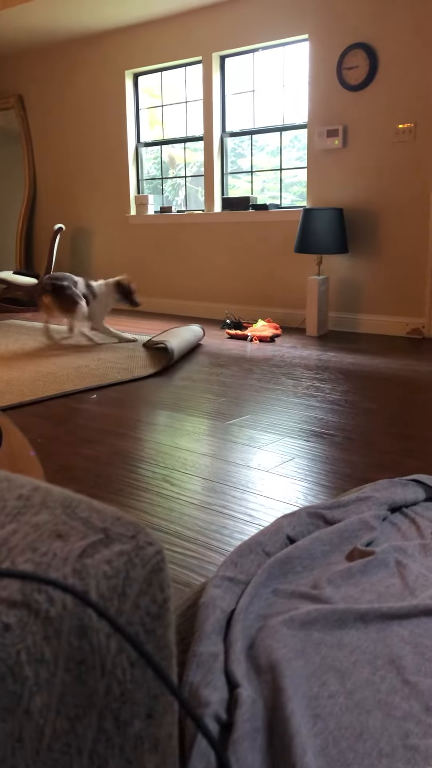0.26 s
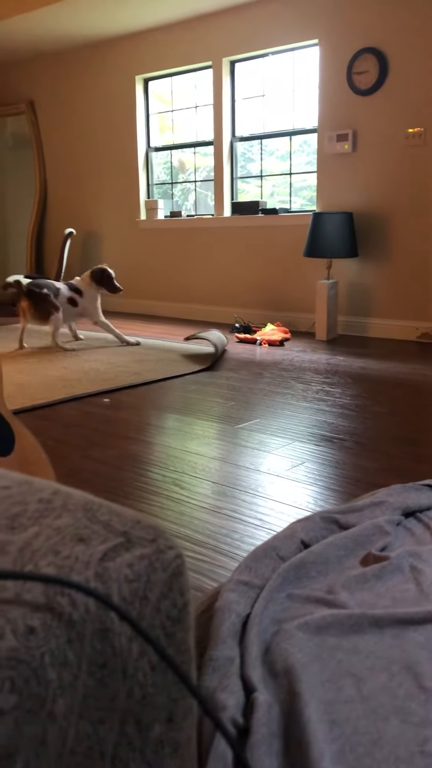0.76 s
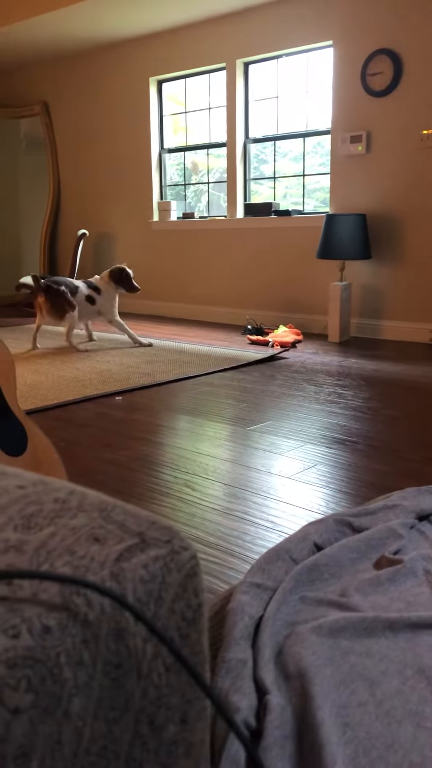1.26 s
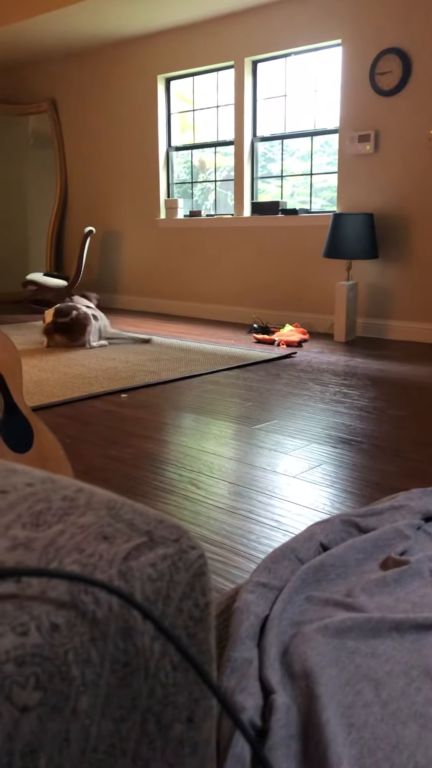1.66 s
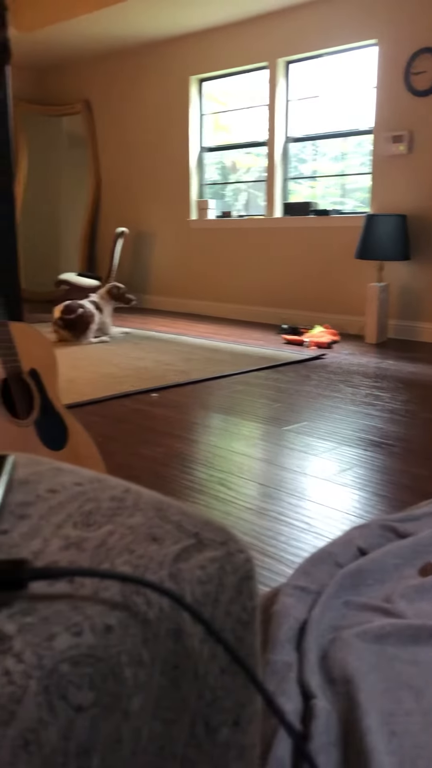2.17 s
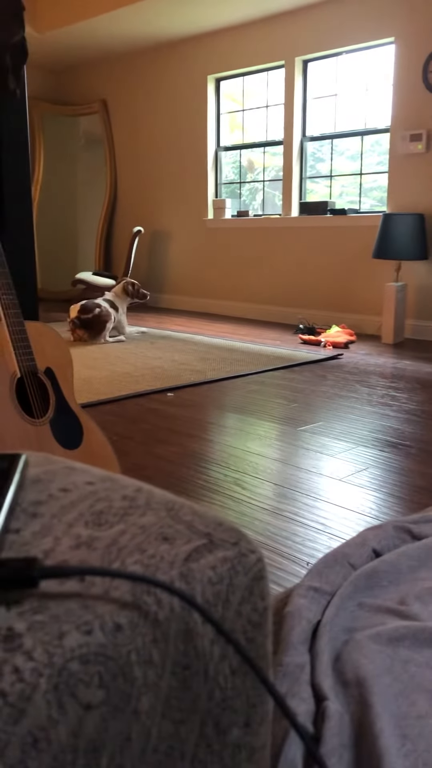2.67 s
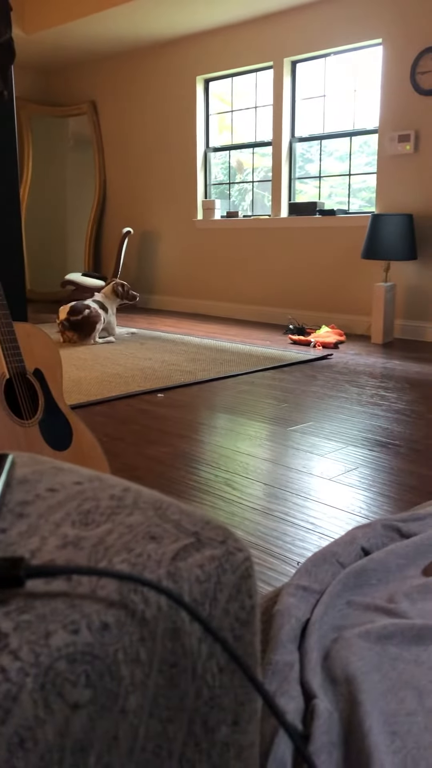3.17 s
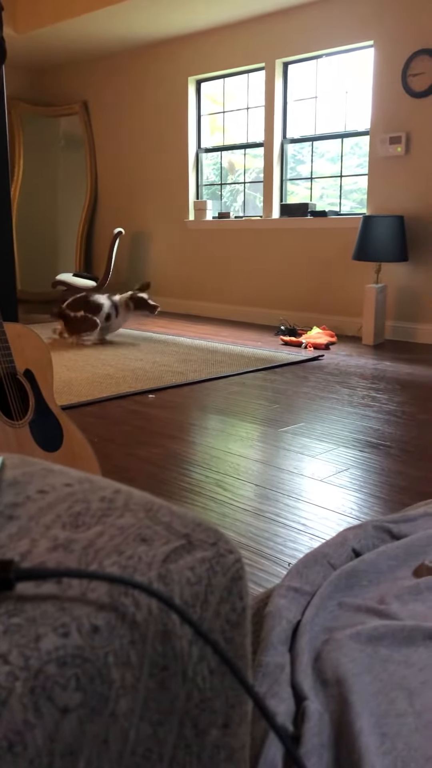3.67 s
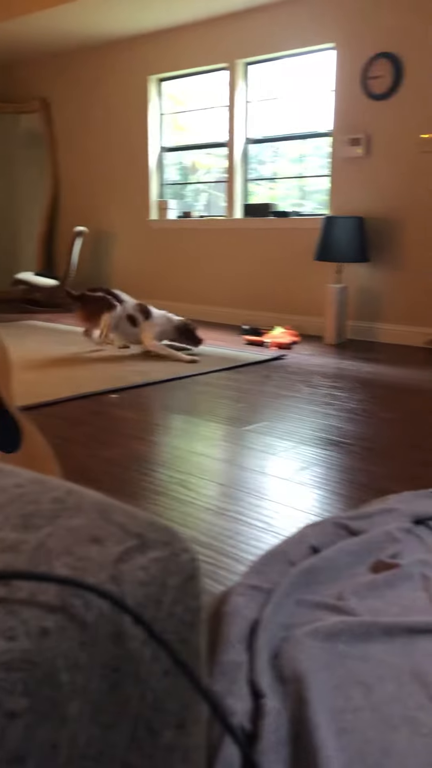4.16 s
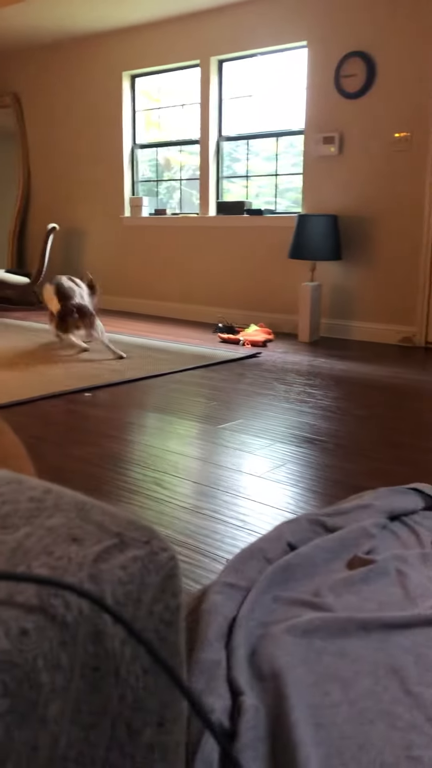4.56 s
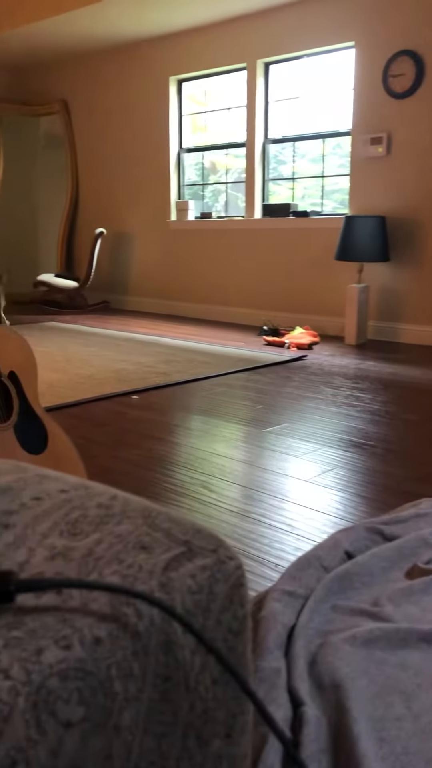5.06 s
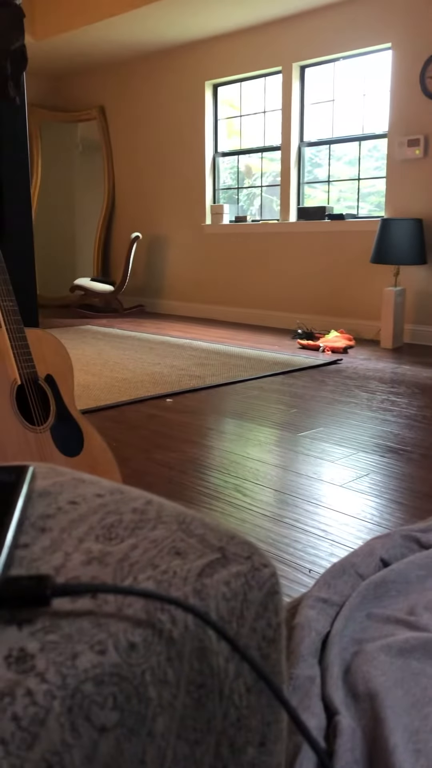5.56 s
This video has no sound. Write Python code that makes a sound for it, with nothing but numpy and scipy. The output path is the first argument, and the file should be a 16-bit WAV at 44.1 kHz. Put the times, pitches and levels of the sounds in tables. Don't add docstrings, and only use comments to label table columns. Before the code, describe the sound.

In an echoing living room, paws shuffle, a rug edge smacks the floor, and scrabbling claws end in hard rattling snaps.

```python
import sys
import numpy as np
from scipy import signal
from scipy.fft import rfft, irfft, next_fast_len
from scipy.io import wavfile

SR = 44100
rng = np.random.default_rng(int(sys.argv[2]) if len(sys.argv) > 2 else 0)


def ratio_of_db(decibels):
    return 10 ** (np.asarray(decibels, float) / 20)


def wav_record(signal):
    frames = np.transpose(np.atleast_2d(signal))
    bounded = np.clip(frames, -1, 1)
    quanta = np.round(bounded * 32767).astype(np.int16)
    wavfile.write(sys.argv[1], SR, quanta)


N = 257103

# frequency in Hz, density in dB per Hz.
AIR_SPECTRUM = [(15, -42), (25, -12), (97, -4), (166, -6.5), (190, -17.5), (700, -18), (1070, -25.5),
                (16000, -42)]
AIR_DB_RMS = -63.5
# frequency in Hz, level in dB rms.
WHINES = [(904.4, -76), (7197, -101), (8000, -93)]

# start in seconds, length in seconds, pad push in dB, claw drag in dB, pile brush in dB.
LEG_STROKES = [(-.03, .12, -42.5, -49, -56.5), (0.13, 0.057, -45.5, -53, -51.5),
               (0.186, 0.079, -44.5, -50.5, -56.5), (0.304, .035, -42, -48, -70),
               (0.358, 0.053, -46, -48.5, -65), (0.42, 0.044, -42.5, -48, -49), (.47, .13, -54, -54.5, -68),
               (1.403, 0.053, -46, -46.5, -65), (1.457, .055, -43, -56, -70), (1.515, .1, -42, -47.5, -51),
               (1.609, 0.091, -42, -47, -53), (1.721, 0.2, -43, -46.5, -54), (1.878, 0.16, -49.5, -54.5, -64),
               (2.054, .11, -48, -52.5, -59), (2.146, 0.085, -56.5, -53, -58.5),
               (3.288, .095, -52, -57.5, -59), (3.37, 0.09, -49.5, -47.5, -64), (3.462, .13, -39, -44.5, -53),
        (3.588, .16, -38, -41, -49.5), (3.75, .1, -41.5, -44.5, -67), (3.87, .1, -37, -44.5, -54),
        (3.958, 0.1, -45, -50.5, -56), (4.092, .13, -48, -53, -64), (4.248, 0.054, -48, -46, -58),
        (4.296, 0.073, -35.5, -42, -53), (4.361, 0.117, -32, -35.5, -53), (4.49, .13, -40.5, -42.5, -52.5),
        (4.658, 0.13, -34.5, -41, -47), (4.784, 0.11, -39, -46, -56), (4.854, 0.097, -36, -39.5, -57),
        (4.973, 0.15, -46.5, -48.5, -70), (5.164, .04, -38, -31, -65), (5.214, 0.13, -47, -39.5, -59),
        (5.263, 0.17, -43.5, -48.5, -42), (5.452, 0.12, -45.5, -57, -39.5), (5.56, .13, -49, -61, -50),
        (5.702, .09, -49, -60, -59), (5.78, .07, -55, -56, -53)]
GRIP_S, LET_GO_S, SAG_DB_PER_S = 0.0144, 0.018, 22
GRIP_SHARE = 0.22
JOISTS_UNDER_PUSH_DB = -21

# time in seconds, peak in dB, pitch in Hz.
BODY_DROPS = [(.005, -43, 128), (.165, -48, 126), (.47, -38, 119), (.472, -36, 271), (.92, -65, 110),
              (1.464, -26, 261), (1.476, -48, 95), (1.501, -32, 147), (1.505, -46, 206), (1.87, -44.5, 127),
              (2.061, -39, 248), (2.16, -55, 253), (3.22, -56.5, 112.7), (3.345, -36, 382),
              (3.40, -35.5, 199), (3.52, -51, 101), (3.901, -30, 144), (3.949, -40, 122), (3.962, -22, 294),
              (5.285, -30, 247), (5.30, -36.5, 159), (5.41, -26.5, 345), (5.433, -26, 246),
              (5.445, -47, 90), (5.56, -52, 100), (5.76, -46, 104), (5.717, -37, 241), (5.75, -36, 340),
              (5.783, -40, 286)]
# time in seconds, peak in dB, pitch in Hz, fibre brush in dB.
CLAW_TICKS = [(.1476, -33, 1790, -60), (.1752, -32, 2630, -84), (.188, -28, 1680, -65),
              (0.3129, -32, 1440, -71), (0.3708, -38, 1840, -48), (0.4371, -32, 1750, -54),
              (1.4622, -32, 1450, -65), (1.517, -27.5, 2560, -65), (1.5637, -30, 2400, -51),
              (3.306, -42, 1524, -54.5), (3.456, -34, 2300, -48), (3.5203, -29, 1450, -46),
              (3.7303, -24.5, 1550, -65), (3.9027, -34, 1900, -52), (4.2644, -24.5, 2560, -61),
              (4.2785, -26, 2660, -53), (4.2967, -18.5, 2090, -52), (4.3256, -25, 2200, -43),
              (4.3668, -12, 2740, -37.5), (4.3802, -37, 2260, -51), (4.401, -26, 2010, -40),
              (4.5699, -37, 2020, -47), (4.6592, -18, 2110, -55), (4.6884, -18.5, 2350, -42),
              (4.702, -24, 2300, -55), (4.7158, -13.5, 2290, -44), (4.8708, -15, 1940, -42.5),
              (5.0657, -28.5, 1360, -58), (5.0878, -29, 1770, -67), (5.1684, -20.5, 2246, -43)]
# time in seconds, peak in dB, pitch in Hz, T60 in seconds.
RATTLES = [(1.2298, -39.5, 2300, .03), (7.1, -33, 9000, .03), (5.454, -28.5, 1600, .02),
           (5.2423, -22, 5500, 0.04), (5.279, -19, 5930, 0.052), (5.291, -25.5, 6900, .05),
           (5.316, -21, 3440, 0.011), (5.326, -31, 11400, .03), (5.401, -26, 6600, 0.017),
           (5.476, -23.5, 4800, 0.055), (5.487, -24.5, 6800, 0.042), (5.498, -25, 2760, 0.038),
           (5.466, -33, 1340, 0.013), (1.535, -49, 4800, 0.25), (1.55, -36.5, 2380, 0.25),
           (.19, -39.5, 1000, 0.081), (3.69, -41, 4900, 0.11)]
# time in seconds, peak in dB, board pitch in Hz.
PAW_LANDINGS = [(.199, -39, 743), (.315, -35.5, 482), (.417, -29.5, 506), (1.559, -28, 550),
                (1.619, -30.5, 478), (1.736, -20.5, 460), (1.76, -20.5, 513), (1.809, -26, 515),
                (1.868, -32, 399), (3.393, -19.5, 435), (3.529, -25, 548), (3.6, -31, 360),
                (3.698, -24, 508), (3.892, -30, 480), (3.917, -26.5, 353), (4.039, -27.5, 605),
                (4.089, -37, 618), (4.238, -37, 493), (4.291, -20, 640), (4.399, -21, 455),
                (4.43, -32, 620), (4.47, -23, 500), (4.58, -26, 500), (4.70, -31, 563), (4.744, -14, 520),
                (4.889, -24, 563), (4.968, -22, 685), (5.172, -24, 588), (5.289, -26, 423),
                (5.699, -43, 392)]

# time in seconds, peak in dB, T60 in seconds.
SLAP_CONTACTS = [
    (1.233, -11, 0.0097),
    (1.2377, -18, 0.023),
    (1.2393, -23, 0.022),
    (1.245, -41, .02),
]
# time in seconds, peak in dB, pitch in Hz, decay in cycles.
SLAP_THUDS = [
    (1.2346, -8, 552, 4.75),
    (1.2352, -24, 830, 7),
    (1.235, -21, 231, 6.3),
    (1.237, -27, 160, 4.6),
]
# start in seconds, length in seconds, ring peak in dB, edge peak in dB.
FLURRIES = [
    (5.2268, .009, -33, -36),
    (5.2408, .009, -29, -44),
    (5.271, .02, -29, -33),
    (5.3055, .011, -31, -22),
    (5.3144, .016, -29, -38),
    (5.3972, .007, -33, -41),
    (5.4533, .004, -25, -13),
    (5.4608, .004, -21, -15),
    (5.4664, .004, -13, -22),
]
SNAP_GAP_S, SNAP_SPREAD_DB = 0.0034, 4

# frequency in Hz, width in Hz, level in dB.
JOISTS = [(110, 50, 2.5), (159, 63, 7)]
# frequency in Hz, width in Hz, level in dB.
BOARDS = [(246, 59, -8), (356, 77, -4.5), (508.5, 64, -2), (652, 120, -4.5), (968, 392, -10)]
# frequency in Hz, width in Hz, level in dB.
WEAVE = [(1285, 1040, -1), (2345, 650, 2.5), (3130, 950, -3.5)]
# frequency in Hz, width in Hz, level in dB.
FIBRES = [(4260, 1920, 0.5), (5610, 1020, 4.5), (7360, 2800, -5), (14300, 3000, -9.5)]
# frequency in Hz, width in Hz, level in dB.
SLAP_COLOUR = [(1190, 1630, -3.5), (2740, 1120, 1.5), (4900, 2660, -0.5), (8870, 4700, -0.5),
               (13400, 5600, -2.5)]
# frequency in Hz, width in Hz, level in dB.
SNAP_RING = [(1450, 600, -3.5), (3220, 1950, 5), (5970, 8500, 1.5)]
# frequency in Hz, width in Hz, level in dB.
SNAP_EDGE = [(8500, 3100, 3.5), (12800, 5400, 8)]
# frequency in Hz, T60 in seconds.
ROOM_T60 = [(100, 0.83), (260, 0.71), (700, 0.71), (1840, 0.76), (4850, 0.59), (9000, 0.43), (14000, 0.34)]


def rms_one(x):
    return x / np.sqrt(np.mean(x ** 2) + 1e-30)


def at_hz(points, hz):
    table_hz, values = np.transpose(points)
    return np.interp(np.log(hz), np.log(table_hz), values)


def add(out, start_s, sound):
    i = round(start_s * SR)
    out[i:i + len(sound)] += sound[:N - i]


def clumps(per_s):
    r = np.exp(-2 * np.pi * per_s / SR)
    return rms_one(signal.lfilter([1], [1, -2 * r, r * r], rng.standard_normal(N)))


def bands(x, gain_of_band):
    edges = 25 * 2 ** np.arange(0, 9.6, 0.5)
    total = 0
    for k, (lo, hi) in enumerate(zip(edges, edges[1:])):
        sos = signal.butter(2, [lo, hi], "band", fs=SR, output="sos")
        total = total + gain_of_band(np.sqrt(lo * hi)) * signal.sosfilt(sos, x[k % 2])
    return total


def resonate(x, hz, width_hz):
    r = np.exp(-np.pi * width_hz / SR)
    zeros = np.array([1, 0, -1]) * (1 - r * r) / 2
    poles = [1, -2 * r * np.cos(2 * np.pi * hz / SR), r * r]
    return signal.lfilter(zeros, poles, x)


def body(x, modes):
    return sum((-1) ** k * ratio_of_db(db) * resonate(x, hz, width_hz) for k, (hz, width_hz, db) in enumerate(modes))


def grains(per_s, spread_db):
    sizes = ratio_of_db(spread_db * np.minimum(rng.exponential(1, N), 4)) * rng.choice([-1, 1], N)
    return sizes * (rng.random(N) < per_s / SR) + 1e-18


def ping(peak_db, hz, cycles):
    turns = hz * np.arange(6000) / SR
    build = (1 - np.exp(-turns / 0.5)) ** 2
    return ratio_of_db(peak_db) * np.sin(2 * np.pi * turns) * build * ratio_of_db(-60 * turns / cycles)


def puff(peak_db, t60_s, modes):
    t = np.arange(6000) / SR
    noise = rng.standard_normal(len(t)) * ratio_of_db(-60 * t / t60_s)
    burst = body(body(noise, modes), modes)
    return ratio_of_db(peak_db) * burst / np.max(np.abs(burst))


def snap(peak_db, modes):
    click = body(body(signal.unit_impulse(256), modes), modes)
    return ratio_of_db(peak_db) * click / np.max(np.abs(click))


def landings(rows, cycles_at_30_db, loss_db_per_db, delay_s):
    out = np.zeros(N)
    for s, db, hz in rows:
        cycles = cycles_at_30_db * ratio_of_db(-loss_db_per_db * (db + 30.5))
        add(out, s + delay_s, ping(db + 1.5, hz, cycles))
    return out


def quiet_room():
    noise = bands(rng.standard_normal((2, N)), lambda hz: ratio_of_db(at_hz(AIR_SPECTRUM, hz)))
    out = ratio_of_db(AIR_DB_RMS) * rms_one(noise)
    t, waver = np.arange(N) / SR, clumps(3.5)
    for hz, db in WHINES:
        out += ratio_of_db(db + 0.88 * waver) * np.sqrt(2) * np.sin(2 * np.pi * hz * t + 0.48 * waver)
    return out


def strokes():
    power = np.zeros((3, N + 2 * SR))
    age = np.arange(-SR // 10, SR // 2) / SR
    for s, length, *levels_db in LEG_STROKES:
        bite = np.clip(age / (GRIP_S + GRIP_SHARE * length) + 0.5, 0, 1)
        lift = np.clip((length - age) / LET_GO_S + 0.5, 0, 1)
        shape = bite * lift * ratio_of_db(-SAG_DB_PER_S * (age - length / 2))
        i = SR + round((s + age[0]) * SR)
        power[:, i:i + len(age)] += np.outer(ratio_of_db(np.array(levels_db)), shape) ** 2
    return np.sqrt(power[:, SR:SR + N])


def scrabble():
    push, drag, brush = strokes()
    bunching = clumps(27.0)
    joists = body(body(grains(370.0, spread_db=2.5), JOISTS), JOISTS)
    boards = body(grains(500.0, spread_db=5.5) * ratio_of_db(2.16 * bunching), BOARDS)
    weave = body(grains(1200.0, spread_db=5.5) * ratio_of_db(2.0 * bunching), WEAVE)
    fibres = body(grains(6000.0, spread_db=2.5) * ratio_of_db(3.7 * bunching), FIBRES)
    wood = push * (ratio_of_db(JOISTS_UNDER_PUSH_DB) * rms_one(joists) + rms_one(boards))
    return wood + drag * rms_one(weave) + brush * rms_one(fibres)


def body_drops():
    return landings(BODY_DROPS, cycles_at_30_db=7.9, loss_db_per_db=0.26, delay_s=0)


def claws():
    out = np.zeros(N)
    for s, db, hz, brush_db in CLAW_TICKS:
        add(out, s, ping(db - 3.5, hz, cycles=15.2))
        add(out, s, puff(db - 12.5, 0.049, WEAVE) + puff(brush_db + 5.0, 0.021, FIBRES))
    return out


def rattles():
    out = np.zeros(N)
    for s, db, hz, t60_s in RATTLES:
        add(out, s, puff(db, t60_s, [(hz, 0.48 * hz, 0)]))
    return out


def paws():
    return landings(PAW_LANDINGS, cycles_at_30_db=16.4, loss_db_per_db=0.57, delay_s=0.00397)


def slap():
    grit, clap = np.zeros(N), np.zeros(N)
    for s, db, t60_s in SLAP_CONTACTS:
        add(grit, s, puff(db, t60_s, SLAP_COLOUR))
    add(clap, SLAP_CONTACTS[0][0], snap(-7.5, SLAP_COLOUR))
    return grit, clap


def slap_thud():
    out = np.zeros(N)
    for s, db, hz, cycles in SLAP_THUDS:
        add(out, s, ping(db + 2.0, hz, cycles))
    return out


def crackle():
    out = np.zeros(N)
    for start, length, flurry_ring_db, flurry_edge_db in FLURRIES:
        chance = rng.standard_normal((8, 3))
        times = np.arange(start, start + length, SNAP_GAP_S)
        for s, (late, ring_chance, edge_chance) in zip(times, chance):
            s = s + SNAP_GAP_S / 12 * late
            ring_db = flurry_ring_db + SNAP_SPREAD_DB * ring_chance
            edge_db = flurry_edge_db + SNAP_SPREAD_DB * edge_chance
            add(out, s, snap(ring_db, SNAP_RING) + snap(edge_db, SNAP_EDGE))
            add(out, s, puff(ring_db - 9, 0.015, SNAP_RING) + puff(edge_db - 6, 0.011, SNAP_EDGE))
    return out


def dull(x, cut_hz):
    r = np.exp(-2 * np.pi * cut_hz / SR)
    return signal.lfilter([1 - r], [1, -r], x)


def tails(count, gap_s):
    t = np.arange(SR) / SR
    tail = bands(rng.standard_normal((2, count, SR)), lambda hz: ratio_of_db(-60 * t / at_hz(ROOM_T60, hz)))
    tail = tail * np.clip((t - gap_s) / 0.0058, 0, 1)
    early_energy = np.sum(tail[:, :SR // 20] ** 2, axis=1, keepdims=True)
    return tail / np.sqrt(early_energy)


def room(x, echoes):
    hop, out = 1024, np.zeros(N)
    pieces = np.pad(x, (0, -N % hop)).reshape(-1, hop)
    size = next_fast_len(SR + hop)
    spectra = rfft(echoes, size)
    for k, piece in enumerate(pieces):
        add(out, k * hop / SR, irfft(rfft(piece, size) * spectra[k % len(spectra)], size))
    return out


def scene():
    air = quiet_room()
    dog = ratio_of_db(-7.5) * scrabble() + body_drops() + claws() + paws() + slap_thud()
    grit, clap = slap()
    knocked = rattles() + crackle()
    sent = ratio_of_db(-1.0) * dog + dull(clap, cut_hz=2760) + ratio_of_db(-1.0) * dull(knocked, cut_hz=5800)
    echo = room(sent, tails(count=8, gap_s=0.00059))
    return (dog + grit + knocked + echo + air)[None]


def roll_off(x):
    return signal.sosfilt(signal.butter(12, 16930, fs=SR, output="sos"), x)


def record(dry):
    x = signal.sosfilt(signal.butter(2, 55, "high", fs=SR, output="sos"), dry)
    x = 0.4 * np.tanh(x / 0.4)
    x = signal.sosfilt(signal.ellip(10, 0.5, 36, 15800, fs=SR, output="sos"), x)
    return roll_off(x)


dry = scene()
out = record(dry)
wav_record(out)
```